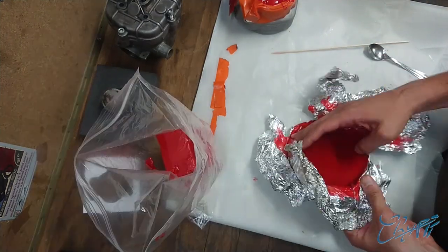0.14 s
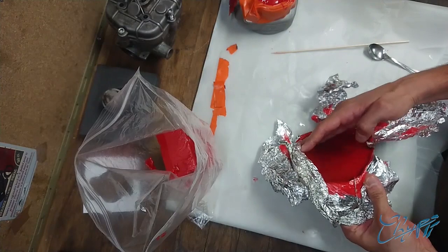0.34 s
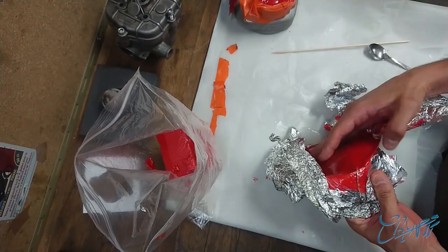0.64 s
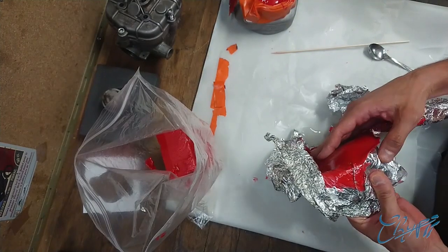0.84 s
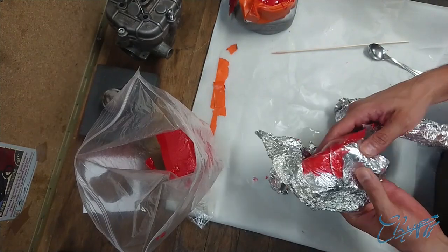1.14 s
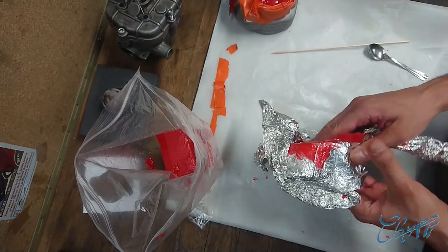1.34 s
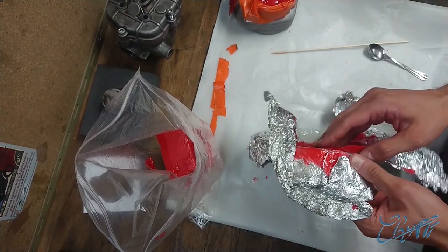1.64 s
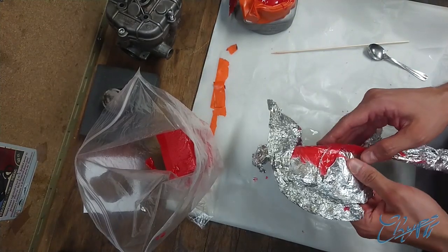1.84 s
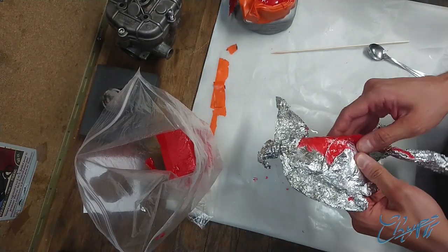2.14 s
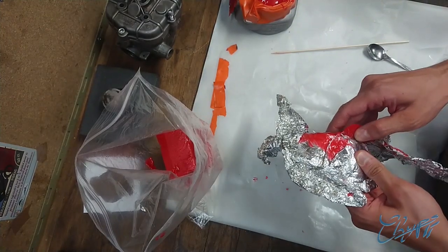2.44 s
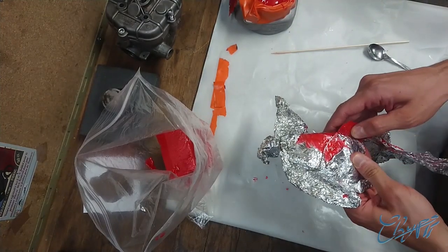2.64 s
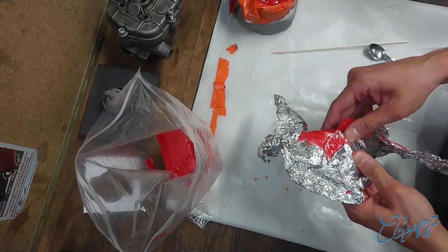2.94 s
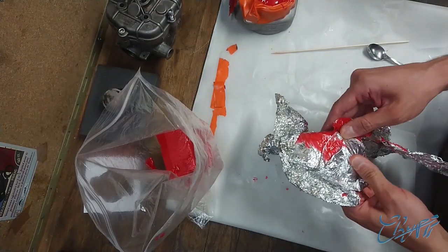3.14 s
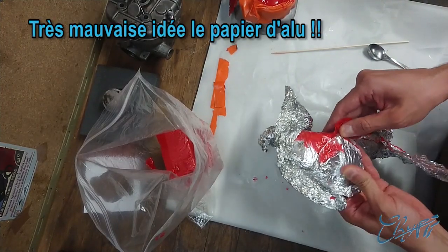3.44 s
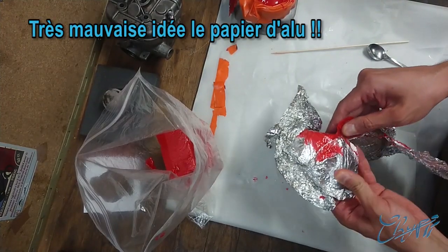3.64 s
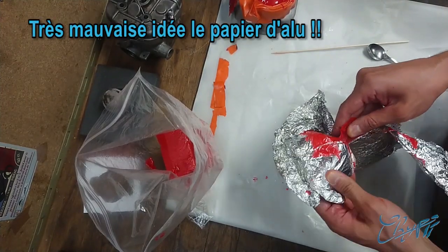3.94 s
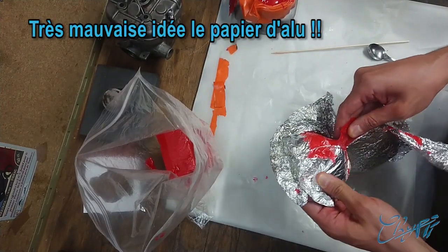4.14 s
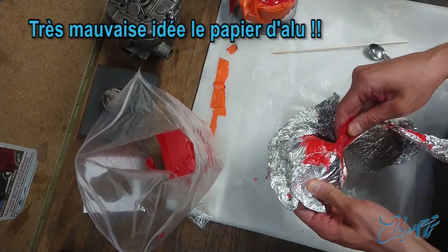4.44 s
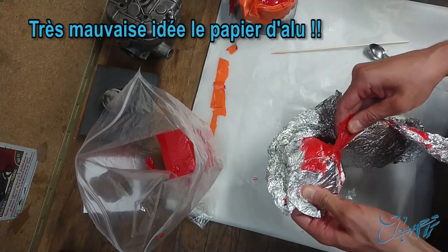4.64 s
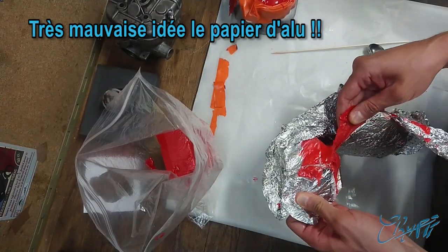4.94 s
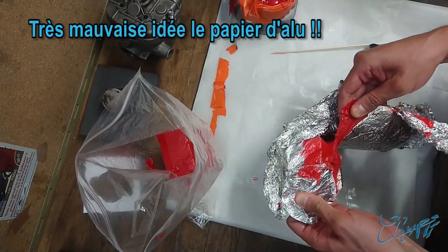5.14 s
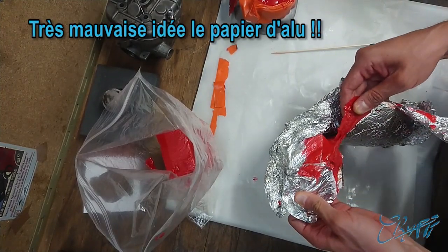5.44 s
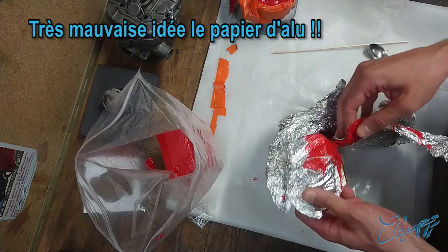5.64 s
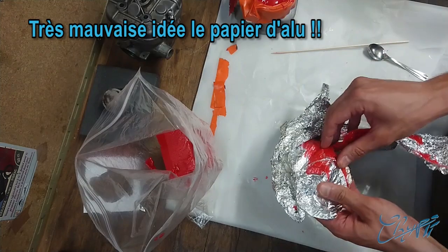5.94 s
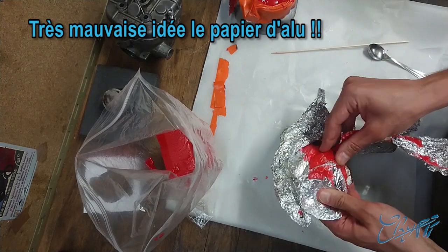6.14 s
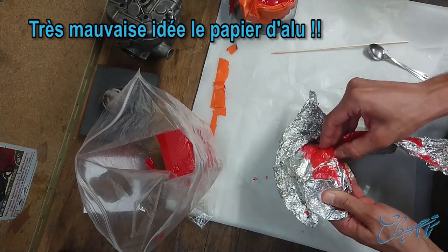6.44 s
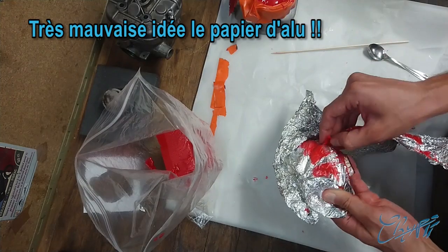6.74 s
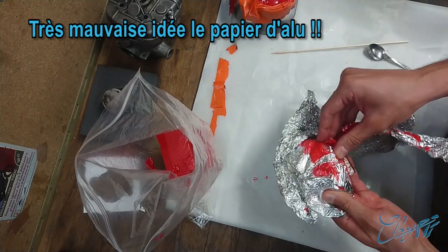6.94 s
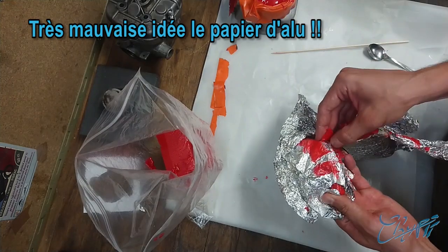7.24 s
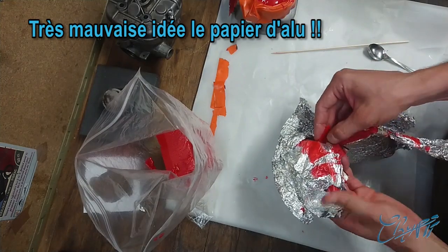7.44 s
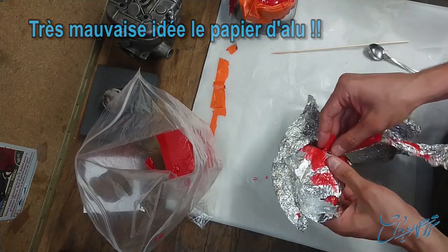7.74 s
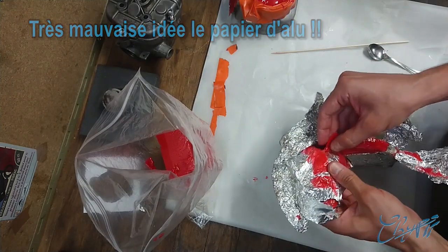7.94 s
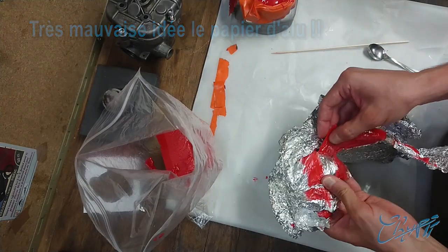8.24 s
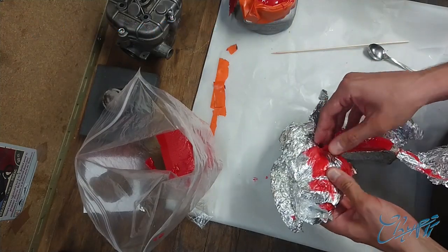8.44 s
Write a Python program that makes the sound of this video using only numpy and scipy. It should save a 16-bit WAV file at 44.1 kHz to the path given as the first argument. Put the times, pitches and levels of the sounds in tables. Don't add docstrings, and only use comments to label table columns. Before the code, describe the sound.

Close, dry foil crackling with sharp metallic ticks, short tears and pauses, while distant machines rumble softly in a small workshop.

```python
import sys
import numpy as np
from scipy import signal
from scipy.fft import rfft, irfft
from scipy.io import wavfile
from scipy.ndimage import uniform_filter1d

SR = 44100
rng = np.random.default_rng(int(sys.argv[2]) if len(sys.argv) > 2 else 0)


def how_loud(loudness_db):
    steps = np.asarray(loudness_db, float) / 20
    return 10 ** steps


def store_pcm(level_fs):
    pcm = np.round(np.clip(level_fs, -1, 1) * 32767).astype(np.int16)
    wavfile.write(sys.argv[1], SR, np.atleast_2d(pcm).T)


N = 378378

# (f/Hz, level/dB per Hz)
FOIL_COLOUR = [(250, -25), (900, -10), (1350, -13), (2900, -5), (4200, -2), (5050, -6), (5550, 2.5),
               (6200, -0.5), (8300, -7), (11300, -2), (12300, -5.5), (12950, 2), (14300, -5), (15700, -10)]


def evened(x):
    return x / np.sqrt(np.mean(x ** 2) + 1e-20)


def read(points, hz):
    f, value = np.transpose(points)
    return np.interp(np.log(hz + 1), np.log(f + 1), value)


def add(mix, start_s, sound):
    part = mix[round(start_s * SR):][:len(sound)]
    part += sound[:len(part)]


def slow(per_s):
    spectrum = rfft(rng.standard_normal(N))
    hz = np.fft.rfftfreq(N, 1 / SR)
    return evened(irfft(spectrum / (1 + (hz / per_s) ** 2), N))


def resonate(x, hz, width_hz):
    turn = np.exp(2j * np.pi * np.cumsum(hz * np.ones(len(x))) / SR)
    r = np.exp(-np.pi * width_hz / SR)
    return 2 * (turn * signal.lfilter([1 - r], [1, -r], x / turn)).real


def causal(colour_db):
    half = np.log(how_loud(np.maximum(colour_db, -70)))
    full = np.concatenate([half, half[-2:0:-1]])
    return np.fft.ifft(np.exp(full - 1j * signal.hilbert(full).imag)).real[:1024]


def patchy(draw, db):
    return db * evened(uniform_filter1d(uniform_filter1d(draw, 20), 20))


def buckle(colour_db, t60_s, draw, click=5.5, rise_s=0.0006, burst=0):
    t = np.arange(len(draw)) / SR
    burst_t60_s = 0.0071
    rattle = draw * how_loud(-60 * t / t60_s) * np.clip(t / rise_s, 0, 1)
    rattle *= 1 + burst * how_loud(-60 * t / burst_t60_s)
    rattle[0] = click
    return irfft(rfft(rattle, 2 * len(t)) * rfft(causal(colour_db), 2 * len(t)))


def snaps(rows, t60_s, hit):
    out, hz = np.zeros(N), np.fft.rfftfreq(2048, 1 / SR)
    t60_s = np.clip(t60_s, .005, .2)
    length = 1536 if t60_s < .03 else 4096
    hard = hit > 2
    rise_s = .0003 if hard else .002
    draws = rng.standard_normal((len(rows), 2, 4096))
    for (start_s, peak_db, size_db), draw in zip(rows, draws):
        bass_db = -9.5 + 0.75 * size_db
        treble_db = 1.5 - 0.3 * size_db
        tilt = [(300, bass_db), (1600, bass_db + 6.5), (3000, 0.0048), (7500, 0), (10000, treble_db - 0.5)]
        colour_db = read(tilt, hz) + read(FOIL_COLOUR, hz) + patchy(draw[0, :1025], 1.8)
        uneven = draw[1] * np.abs(np.roll(draw[0], 7))
        pop = buckle(colour_db, t60_s, uneven[:length], click=hit, rise_s=rise_s, burst=1.42 * hard)
        loudest = np.sqrt(uniform_filter1d(pop ** 2, 66).max())
        add(out, start_s, pop * how_loud(peak_db - 0.4) / loudest)
    return out


def hum():
    # (f/Hz, level/dB per Hz)
    rumble_colour = [(19, -35), (32, -7), (69, -1), (118, 1), (160, -3), (251, -23), (364, -20), (775, -26),
                     (987, -25.5), (1500, -24), (2100, -36), (3600, -64)]
    # (f/Hz, width/Hz, level/dB)
    drones = [
        (66, 12.6, 0),
        (124.3, 21, -5),
        (320.5, 3.1, -22.5),
    ]
    # (t/s, level/dB)
    swell = [(0.0, -41), (0.6, -60), (4.18, -48), (4.25, -63.5), (5.02, -46), (8.44, -79), (8.58, -47)]
    noise = rng.standard_normal((len(drones) + 1, N))
    colour = how_loud(read(rumble_colour, np.fft.rfftfreq(N, 1 / SR)))
    rumble = evened(irfft(rfft(noise[0]) * colour, N))
    tones = []
    for (hz, width_hz, db), draw in zip(drones, noise[1:]):
        tone = resonate(resonate(draw, hz, width_hz), hz, 3 * width_hz)
        tones.append(how_loud(db) * evened(tone))
    swell_s, swell_db = np.transpose(swell)
    tones[0] = tones[0] * how_loud(np.interp(np.arange(N) / SR, swell_s, swell_db - np.mean(swell_db)))
    return how_loud(-50.5) * (rumble * how_loud(-1.5) + how_loud(-7.0) * sum(tones))


def effort(t):
    # (from t/s, to t/s, crinkle level/dB, crease size/dB)
    pulls = [(0.234, 0.363, -36.5, 3.5), (0.417, 0.733, -43, 7), (0.9, 1.123, -40, 2.5),
             (1.158, 1.32, -37.5, 2), (1.393, 1.502, -41.5, 4.5), (1.568, 1.581, -29, -5),
             (1.763, 1.781, -34, -6), (1.833, 1.893, -39.5, -0.5), (2.689, 2.758, -42.5, -3.5),
             (3.072, 3.107, -43.5, -0.5), (3.253, 3.361, -44.5, 4), (3.508, 3.672, -36.5, 2.5),
             (3.702, 3.834, -34.5, 0.5), (3.836, 3.951, -33.5, -5), (4.09, 4.141, -37.5, 5.5),
             (4.67, 4.839, -46.5, 2.5), (5.551, 5.59, -29.5, -1.5), (5.657, 5.696, -33, -1),
             (6.956, 7.102, -38, 6), (7.15, 7.184, -49.5, 3), (7.52, 7.704, -38, 1.5),
             (7.72, 7.772, -35.5, -5.5), (8.4, 8.58, -42, 0.5)]
    # (t/s, crinkle level/dB, fade/dB per s, crease size/dB)
    squeezes = [(.02, -60.5, 103, 8), (.8, -38.5, 260, 4), (1.363, -32, 300, -1.5), (2.046, -38, 106, -4.5),
                (2.345, -47.5, 198, 1.5), (2.53, -50, 188, -3), (2.44, -62, 100, 0),
                (2.794, -30.5, 698, -7), (2.902, -36.5, 266, -1), (2.97, -45.5, 272, 1),
                (3.16, -46, 101, 2.5), (1.966, -39, 300, -2.5), (.71, -37, 200, 4), (3.765, -35, 250, -12),
                (8.47, -43, 200, 0), (2.23, -56.5, 200, 10), (3.42, -47, 80, 4), (4.2, -44, 26, 1.5),
                (4.42, -44, 118, 3), (4.594, -46, 129, 1.5), (5.04, -55, 200, 3.5),
                (5.165, -49.5, 167, 5.5), (5.49, -56, 150, 4), (5.82, -42, 250, 1.5), (5.91, -63, 60, 21),
                (6.088, -39.5, 75, -0.5), (6.354, -37.5, 150, -0.5), (6.479, -34, 176, 5),
                (6.583, -41, 170, 7), (6.696, -41, 166, 5), (6.83, -38.5, 149, 0), (7.421, -33.5, 120, 3),
                (7.88, -50.5, 64, 0), (8.08, -71, 62, 2), (8.163, -46, 133, 3), (8.32, -49.5, 86, 4.5)]
    hands_on_s = .2115
    rest_db, rest_size_db = -70.5, 3
    moves = [(a, b, db, 474, 272, size) for a, b, db, size in pulls]  # rise, fade in dB per s
    moves += [(s, s, db, 1.33 * fade, fade, size) for s, db, fade, size in squeezes]
    start, end, db, rise, fade, size_db = np.transpose(moves)[:, :, None]
    move_db = db - rise * np.maximum(start - t, 0) - fade * np.maximum(t - end, 0)
    power = how_loud(move_db) ** 2 * ((t > hands_on_s) | (start < hands_on_s))
    rest_power = how_loud(rest_db) ** 2
    total = power.sum(0) + rest_power
    return 10 * np.log10(total), ((power * size_db).sum(0) + rest_power * rest_size_db) / total


def crinkle():
    t, hz = np.arange(N) / SR, np.fft.rfftfreq(2048, 1 / SR)
    coarse_s = t[::44]
    level_db, size_db = effort(coarse_s)
    folds_db = -7.5 + size_db
    fine_db = 0.5 - 0.21 * size_db
    clump = how_loud(0.77 * slow(42) + 0.26 * slow(380))
    sizes = [(240, 2950, folds_db, 700, 0.061),
             (2850, 10160, 0 * coarse_s, 1200, 0.023),
             (7930, 40000, fine_db, 3000, 0.0047)]
    jolt = np.minimum(rng.exponential(1, N), 3.4)
    chance, out = rng.random(N), np.zeros(N)
    for lo_hz, hi_hz, share_db, per_s, t60_s in sizes:
        hits = how_loud(2.35 * jolt) * (chance < per_s / SR) * clump
        edges_db = -10 * np.log10((1 + (lo_hz / (hz + 1)) ** 8) * (1 + (hz / hi_hz) ** 8))
        kind, layer = rng.integers(0, 20, N), np.zeros(N)
        for k in range(20):
            colour_db = read(FOIL_COLOUR, hz) + edges_db + patchy(rng.standard_normal(1025), 5.0)
            grain = buckle(colour_db, t60_s * rng.uniform(0.38, 4.8), rng.standard_normal(2048))
            grain = grain[:2048] / np.linalg.norm(grain)
            layer += signal.oaconvolve(hits * (kind == k), grain)[:N]
        out += evened(layer) * how_loud(np.interp(t, coarse_s, level_db + share_db))
    return how_loud(-1.5) * out


def nicks():
    # (t/s, peak level/dB, facet size/dB)
    nick_rows = [(.0095, -47.5, 32), (.0495, -51, 0), (0.698, -35, -9), (1.075, -30, -7), (1.358, -19, -15),
                 (1.374, -30, 18), (1.714, -25, -12), (1.795, -33, -11), (1.9942, -27, -13),
                 (2.4123, -46, 4), (2.547, -39, 6), (3.286, -36, -2), (3.4587, -52, -2),
                 (3.6648, -28.5, -8), (4.0344, -36, -3), (4.4006, -35, 21), (4.501, -47, 6),
                 (4.552, -57, 15), (4.571, -41, 6), (5.1366, -42, -23), (5.315, -50, 17), (5.9554, -38, -3),
                 (5.9658, -40, -3), (6.052, -30, 4), (6.211, -29.5, 7), (6.254, -35, 7), (6.267, -44, 26),
                 (6.28, -35, 19), (6.348, -29.5, 4), (6.391, -33, 1), (6.6936, -31, 7), (6.7427, -44, -2),
                 (6.935, -25, 9), (6.942, -36, 2), (6.994, -26, -7), (7.004, -20.5, 2), (7.04, -26, 7),
                 (7.0673, -28, -8), (7.236, -45, 8), (7.2917, -41, 0), (7.374, -45, 0), (7.8382, -35, -6),
                 (8.0433, -43, -6), (8.156, -38, 6), (8.1755, -33, -11), (8.274, -48, -5), (6.594, -33, 0),
                 (6.634, -43, 0), (1.198, -26, 6), (4.319, -39, -10), (6.482, -24, -5), (2.351, -50, -14),
                 (4.82, -33, -6)]
    # (t/s, peak level/dB, facet size/dB)
    more_nick_rows = [(.2987, -32, -4), (.4194, -33, 3), (.374, -31, 12), (1.3393, -26, -10), (1.4585, -28, 0),
                      (1.477, -26, 0), (1.5458, -30, -7), (2.151, -37, 6), (3.6963, -29, -8), (3.771, -28, -1),
                      (3.806, -26, 15), (5.4805, -44, -5), (6.166, -30, 5), (6.6655, -30, 5), (7.033, -25, -20),
                      (7.087, -26, 0), (7.5104, -29, 0), (7.768, -28, 4), (8.5235, -36, -3), (2.5118, -40, -20),
                      (5.4705, -48, 5), (7.484, -40, -2)]
    return snaps(nick_rows, 0.024, 4) + snaps(more_nick_rows, 0.024, 4)


def thuds():
    # (t/s, level/dB, f/Hz, t60/s)
    bumps = [
        (0.063, -25, 105.4, 0.087),
        (4.09, -40.5, 216.5, 0.083),
        (7.771, -37, 120, 0.067),
        (1.28, -34.5, 420, 0.033),
        (3.329, -50.5, 351, 0.21),
        (6.512, -44, 380, 0.05),
    ]
    out, t = np.zeros(N), np.arange(round(.2 * SR)) / SR
    for start_s, db, hz, t60_s in bumps:
        overtone = 0.23 * np.sin(2 * np.pi * 3.45 * hz * t) * how_loud(-60 * t / t60_s)
        note = np.sin(2 * np.pi * hz * t) + overtone
        add(out, start_s, note * how_loud(db - 60 * t / t60_s) * np.clip(t / 0.0044, 0, 1))
    return out


def pings():
    # (t/s, peak level/dB, f/Hz, t60/s)
    patches = [(1.563, -12.5, 3920, 0.021), (3.606, -26, 2000, 0.037), (5.15, -32.5, 1040, 0.029),
               (6.46, -24, 924, 0.042), (6.479, -22, 3660, 0.035), (6.508, -8.5, 3170, 0.015),
               (6.509, -7, 2120, 0.01), (7.388, -27, 2560, 0.029), (8.152, -10, 1940, 0.0078),
               (8.152, -15.5, 2860, 0.011), (.064, -47, 3620, 0.034), (.064, -48, 2600, .03),
               (6.9785, -7.5, 2970, 0.01)]
    out, t = np.zeros(N), np.arange(round(.1 * SR)) / SR
    for start_s, db, hz, t60_s in patches:
        note = np.sin(2 * np.pi * hz * t * (1 - 0.13 * t)) * np.clip(t / 0.0019, 0, 1)
        add(out, start_s, note * how_loud(db - 4 - 60 * t / np.clip(t60_s, .01, .035)))
    return out


def slack_facets():
    # (t/s, peak level/dB, facet size/dB)
    pop_rows = [(0.2152, -22.5, -28), (.258, -28, -6), (0.5162, -29.5, 6), (0.8823, -38, -13),
                (1.2706, -23, 13.5), (1.6804, -27, -20), (1.732, -23.5, 3.5), (1.8943, -31.5, -2),
                (2.35, -49, -5), (3.12, -35.5, 16), (3.3077, -28.5, 11), (3.354, -28.5, 1.5),
                (3.478, -25.5, 3), (3.816, -27, 11), (4.32, -52, -7), (4.786, -33.5, -1), (4.813, -33, 14),
                (4.9682, -46.5, 24), (5.503, -40, 7), (5.582, -25, -18), (5.9778, -27.5, 3),
                (6.46, -18, -4), (6.66, -32, 0), (6.84, -33, -5), (7.3085, -30.5, 8), (7.339, -36, 12),
                (7.8456, -34, 2), (8.318, -44, 5), (8.3777, -34, 15), (8.4174, -44, 22)]
    # (t/s, peak level/dB, facet size/dB)
    slip_rows = [(0.196, -41.5, 8), (2.321, -43, 10), (4.352, -47, 13), (0.313, -27, -6), (.796, -44, 3),
                 (.487, -30, -16), (1.15, -30, -22), (5.355, -51.5, 16), (2.0204, -28, -23),
                 (2.171, -43, 14), (2.738, -32, -1), (2.793, -34, 16), (2.8918, -30.5, 0),
                 (3.2347, -33, -6), (3.326, -28, -20), (5.271, -46.5, 15), (5.479, -49, 35),
                 (5.533, -30, -10), (5.606, -36, 7), (5.645, -24, -21), (5.79, -34.5, 5),
                 (5.886, -41.5, 13), (6.0781, -28, 4), (6.201, -39, 10), (6.568, -27.5, 3),
                 (6.9141, -35.5, 14), (6.949, -36, 14), (7.1024, -28, 1), (7.5234, -27.5, -18),
                 (7.7646, -31, -7), (7.931, -38, 6), (8.072, -45.5, 14)]
    # (t/s, peak level/dB, facet size/dB)
    rip_rows = [
        (.2119, -29, 12),
        (1.533, -28, 19.5),
        (1.676, -36.5, 14),
        (1.701, -27, -30),
        (4.075, -26.5, 3),
        (6.4535, -32, -11),
    ]
    return snaps(pop_rows, 0.044, 1.2) + snaps(slip_rows, 0.13, .7) + snaps(rip_rows, 0.18, .6)


def stiff_facets():
    # (t/s, peak level/dB, facet size/dB)
    crack_rows = [(1.4402, -26.5, -27), (2.3814, -30, -6), (2.5042, -22.5, -1.5), (4.1444, -21.5, -18),
                  (4.518, -33.5, 5), (4.5892, -20, 2), (.6033, -33, -7), (4.7294, -23.5, -24),
                  (5.1304, -34, -31), (5.1565, -33, -38), (5.18, -41, 9), (5.99, -28, 0),
                  (6.1099, -31, -13), (6.178, -23.5, -5), (6.189, -29, -1), (6.2458, -28.5, 6),
                  (6.6109, -27.5, 6), (6.6236, -39, 6), (6.922, -29, -11), (6.9781, -17.5, -9),
                  (.9118, -27.5, 0), (7.0539, -28, -14), (7.0968, -32, -8), (7.262, -36.5, -15),
                  (7.821, -24, -3), (7.8693, -30, -26), (7.9123, -32, -26), (8.018, -40, -19),
                  (8.1512, -17, 10.5), (8.1527, -18, 6), (8.2386, -28.5, -12)]
    # (t/s, peak level/dB, facet size/dB)
    tick_rows = [(7.0122, -20.5, 16.5), (4.6035, -32, -3), (1.4012, -20, -20), (1.4938, -23.5, 2),
                 (1.6575, -32, 10), (1.8105, -24.5, -10), (2.8354, -24, -27), (2.8476, -27, 3),
                 (2.9518, -35, 1), (3.553, -34, 0), (1.118, -28, -15), (4.797, -29.5, -6),
                 (4.8858, -38.5, 0), (4.9373, -33, 12), (5.0307, -31, -7), (5.204, -29, 8),
                 (1.294, -28, -2), (5.444, -37.5, 14), (5.916, -36.5, 8), (6.0072, -28.5, -6),
                 (6.307, -27, 2), (6.502, -24, 1), (6.5108, -22.5, 11), (6.538, -25, 12), (6.729, -34.5, 9),
                 (6.873, -28.5, 6), (7.155, -26.5, -6), (7.6748, -24, -18), (7.902, -34, -13),
                 (8.095, -44, 4)]
    return snaps(crack_rows, 0.026, 6.5) + snaps(tick_rows, 0.036, 4)


def squeaks():
    # (from t/s, to t/s, f/Hz, level/dB)
    strips = [(4.07, 4.126, 631, -47), (4.075, 4.121, 1511, -52), (4.07, 4.111, 2501, -48),
              (4.44, 4.476, 2091, -55), (4.49, 4.521, 2041, -58), (4.585, 4.641, 2081, -56),
              (4.69, 4.746, 2021, -56), (4.45, 4.491, 1031, -58), (4.61, 4.671, 991, -58),
              (4.34, 4.391, 661, -58), (3.295, 3.361, 1251, -51), (3.24, 3.291, 1241, -57),
              (3.48, 3.561, 1281, -53), (3.545, 3.626, 2101, -51), (3.485, 3.561, 801, -55),
              (3.09, 3.146, 841, -57), (3.595, 3.641, 851, -55), (2.78, 2.806, 6051, -41),
              (2.89, 2.931, 5651, -44), (6.585, 6.611, 611, -53), (3.99, 4.031, 1261, -58),
              (3.9, 3.961, 5651, -44), (7.0, 7.061, 601, -53), (6.255, 6.281, 1001, -53)]
    q = 40
    out, waver = np.zeros(N), 1 + .007 * slow(25)
    draws = rng.standard_normal((len(strips), SR // 8))
    for (start_s, end_s, hz, db), draw in zip(strips, draws):
        at = round(start_s * SR)
        length = min(round((end_s - start_s) * SR), len(draw) - 1000)
        path_hz = hz * waver[at:at + len(draw)]
        note = resonate(resonate(draw, path_hz, hz / q), path_hz, hz / q)[-length:]
        add(out, start_s, how_loud(db) * evened(note) * np.sqrt(np.hanning(length)))
    return out


def hollows(x):
    # (from t/s, to t/s, f/Hz, lift/dB)
    pockets = [(.22, .38, 3000, -4), (2.68, 2.92, 4300, -4), (3.45, 3.62, 2950, -4), (1.25, 1.45, 13200, 2),
               (.42, .75, 4900, 2), (7.3, 7.55, 4200, 4), (.4, .78, 1050, 3), (.3, .8, 580, 6),
               (1.12, 1.58, 620, 5), (4.15, 4.45, 640, 8), (6.54, 6.64, 600, 7), (6.96, 7.08, 600, 6),
               (2.7, 2.85, 800, 6), (1.1, 1.5, 1700, 4), (5.9, 6.3, 1000, 4), (6.3, 6.4, 5800, 4),
               (6.66, 6.87, 5700, 4), (6.78, 6.9, 4000, 5), (.6, .86, 5800, 4), (1.1, 1.45, 12000, 2),
               (1.46, 1.62, 8800, 4), (3.72, 3.8, 9500, 3), (5.35, 5.6, 800, 4), (2.75, 2.95, 650, 4),
               (0.93, 1.24, 2960, 3), (.95, 1.13, 5900, 3), (1.67, 2.095, 4580, 5.5),
               (1.684, 2.29, 2850, 1.5), (4.35, 4.5, 5900, 4), (1.45, 1.52, 6200, 4), (2.78, 2.8, 6000, 7),
               (7.08, 7.11, 5800, 5), (2.863, 2.96, 1550, 9), (3.052, 3.65, 846, 6), (3.18, 3.42, 1240, 9),
               (3.44, 3.67, 2080, 5), (4.066, 4.145, 647, 5), (4.417, 4.76, 2050, 8), (4.458, 4.72, 990, 6),
               (3.74, 3.86, 4400, 2), (7.71, 7.785, 6100, 8), (7.704, 7.79, 10600, 4), (7.7, 7.79, 4370, 6),
               (5.64, 5.72, 5800, 4)]
    hz, t, z = signal.stft(x, SR, nperseg=512)
    drift = uniform_filter1d(uniform_filter1d(rng.standard_normal(z.shape), 3, 0), 14, 1)
    shape = uniform_filter1d(uniform_filter1d(rng.standard_normal(z.shape), 10, 0), 50, 1)
    lift_db = 2.14 * evened(drift) + 1.02 * evened(shape)
    for start_s, end_s, pocket_hz, db in pockets:
        lasting = np.clip(np.minimum(t - start_s, end_s - t) / .02 + .5, 0, 1)
        width_hz = 60 + 2.2e-5 * pocket_hz ** 2
        peak = np.exp(-((hz - pocket_hz) / width_hz) ** 2)
        lift_db = lift_db + db * np.outer(peak, lasting)
    return signal.istft(z * how_loud(lift_db - 1.08), SR, nperseg=512)[1][:N]


def workshop():
    room_db, t60_s = -16, .14
    taps = np.zeros(SR // 4)
    at = np.arange(60, len(taps) - 10, 10)
    at = at + rng.integers(0, 10, len(at))
    taps[at] = rng.choice([-1., 1.], len(at)) * how_loud(-60 * at / SR / t60_s)
    taps *= how_loud(room_db) / np.linalg.norm(taps)
    taps[0] = 1
    return taps


def scene():
    floor = hum() + thuds()
    through_hollows = hollows(crinkle() + slack_facets())
    straight = nicks() + pings() + stiff_facets() + squeaks()
    foil = through_hollows + straight
    mono = signal.oaconvolve(foil, workshop())[:N] + floor
    return np.array([mono, mono])


def low_pass(x):
    return signal.sosfilt(signal.butter(12, 17000, fs=SR, output="sos"), x)


def record(dry):
    capsule = signal.butter(2, 38, "high", fs=SR, output="sos")
    edge = signal.firwin(1201, 15760, window=("kaiser", 8), fs=SR)
    bright = signal.sosfilt(capsule, dry)
    mix = signal.oaconvolve(bright, edge[None], "same")
    return low_pass(mix)


dry = scene()
out = record(dry)
store_pcm(out)
```